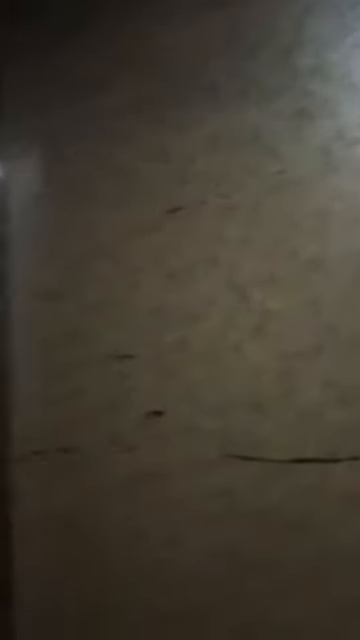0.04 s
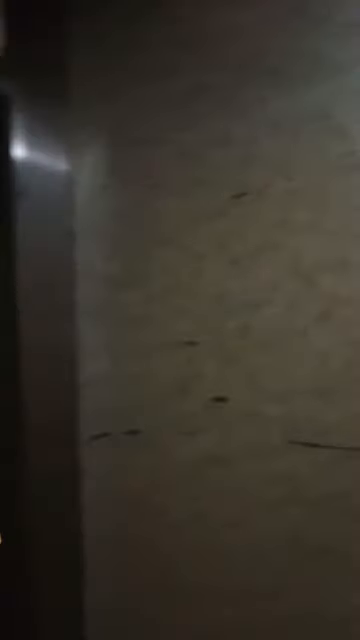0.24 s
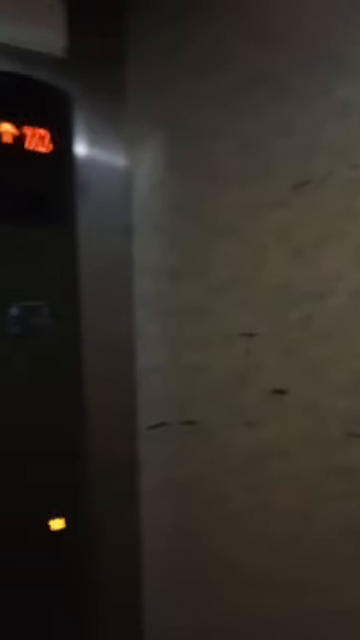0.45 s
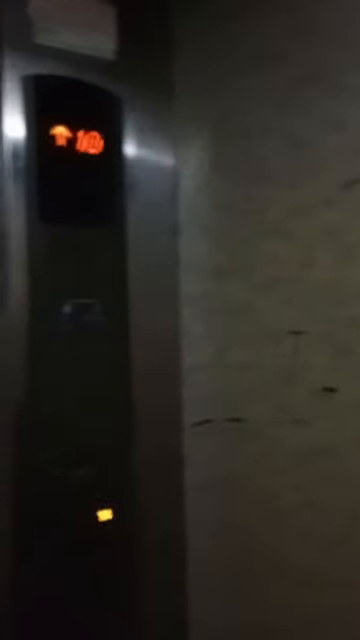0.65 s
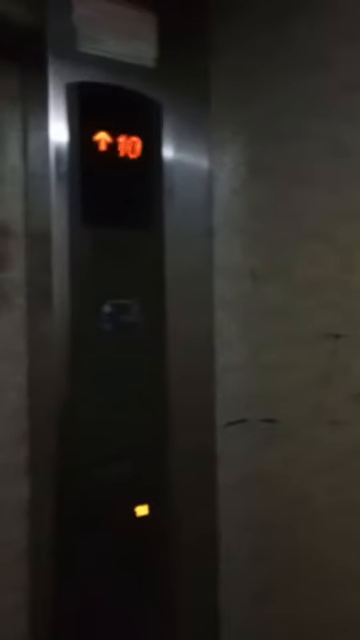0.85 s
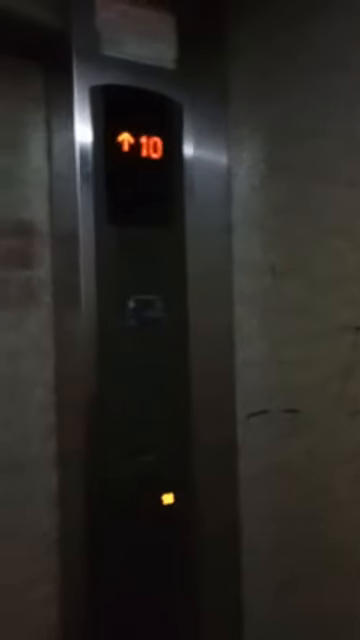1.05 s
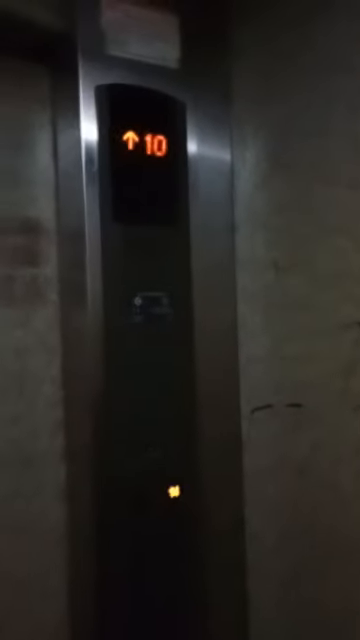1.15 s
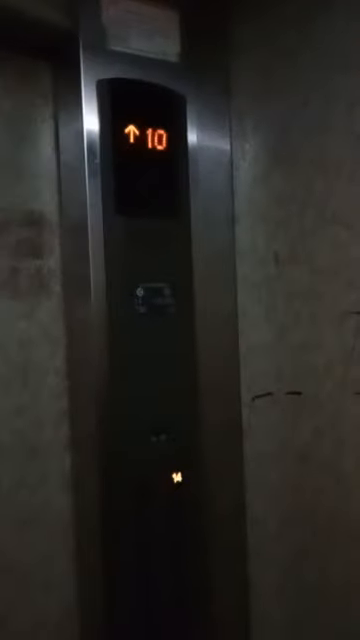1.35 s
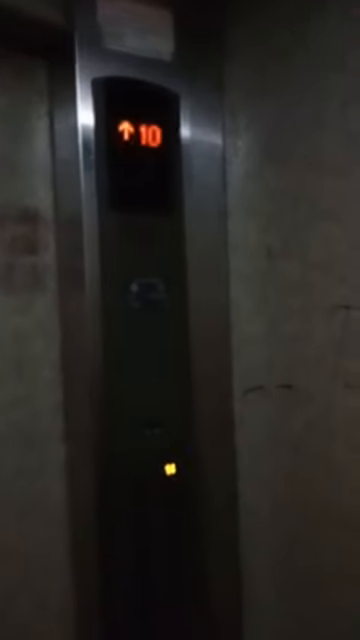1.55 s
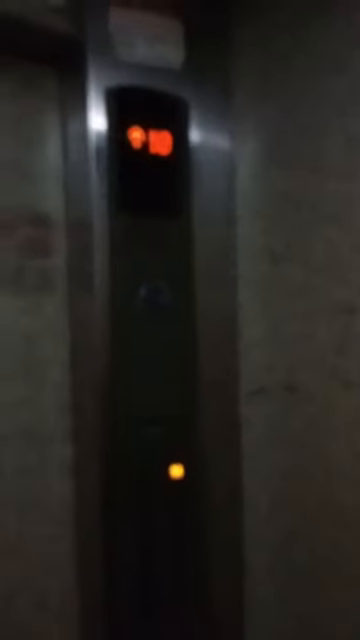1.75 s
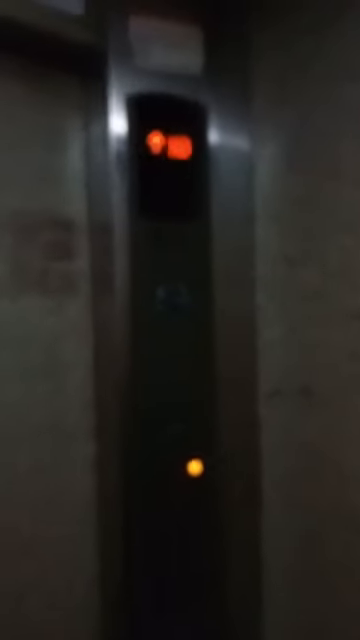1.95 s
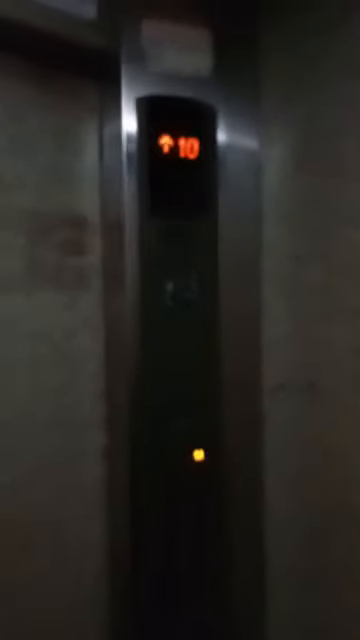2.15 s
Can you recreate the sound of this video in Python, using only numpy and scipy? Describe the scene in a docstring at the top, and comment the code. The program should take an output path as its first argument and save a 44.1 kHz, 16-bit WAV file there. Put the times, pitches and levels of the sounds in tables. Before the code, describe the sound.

Loose metal rattling and scraping in short dry bursts inside a small moving elevator cabin

```python
"""Inside a small old lift cabin on its way up, over the drone and rumble of the ride, something loose
rattles and scrapes in short dry bursts, some contacts knock with a hollow ring, and the floor thumps.
Scrapes and knocks are random slips filtered by resonances; squeaks and thumps are enveloped sines.
The ride is filtered noise with wavering sines; standing waves hum and boom in the air, and the hard
walls answer every scrape, knock and squeak with a dense decaying tail."""
import sys
import numpy as np
from scipy import signal
from scipy.fft import rfft, irfft, next_fast_len
from scipy.io import wavfile
from scipy.ndimage import map_coordinates

SR = 44100
rng = np.random.default_rng(int(sys.argv[2]) if len(sys.argv) > 2 else 0)


def pcm_store(signal):
    """Save signal as 16-bit PCM."""
    levels = np.round(np.clip(np.atleast_2d(signal), -1, 1) * 32767)
    wavfile.write(sys.argv[1], SR, levels.astype(np.int16).T)


N = 97020


def amp(db):
    """Level to amplitude: 20 dB is a factor of ten."""
    return 10 ** (np.asarray(db) / 20)


def unit(x):
    """Normalise the mean power: scale to rms 1."""
    return x / np.sqrt(np.mean(x ** 2) + 1e-20)


def along(points, hz):
    """Interpolate (frequency [Hz], value) points on a logarithmic frequency axis."""
    f, v = np.transpose(points)
    return np.interp(np.log(hz + 1), np.log(f + 1), v)


def wobble(rate):
    """Band-limited randomness: a smooth curve through random knots, rate of them per second."""
    knots = rng.standard_normal(int(N * rate / SR) + 4)
    return map_coordinates(knots, [np.arange(N) * rate / SR])


def coloured(x, gain):
    """Minimum-phase filtering: the folded cepstrum of gain(f) gives a causal response."""
    size = 2 * next_fast_len(len(x) // 2 + 2048)
    magnitude = np.maximum(gain(np.fft.rfftfreq(size, 1 / SR)), 1e-6)
    cepstrum = irfft(np.log(magnitude), size)
    cepstrum[1:size // 2] *= 2
    cepstrum[size // 2 + 1:] = 0
    response = np.exp(rfft(cepstrum))
    return irfft(rfft(x, size) * response, size)[:len(x)]


def resonances(modes, f, order=1):
    """Damped-oscillator gains of (Hz, width Hz, dB) modes, summed in power; order steepens the skirts."""
    power = 0
    for centre, width, db in modes:
        response = abs(f * width / (centre * centre - f * f + 1j * f * width))
        power = power + (amp(db) * response ** order) ** 2
    return np.sqrt(power)


def add(track, start, sound):
    """Superposition: mix a sound into the track at its start time in seconds."""
    part = track[max(0, round(start * SR)):][:len(sound)]
    part += sound[:len(part)]


def cabin():
    """Reverberation of close walls: dense noise decaying at a rate set by frequency."""
    # reverberation time: (frequency [Hz], time to fall 60 dB [s])
    decay_times = [(200, 0.68), (1000, 0.26), (3000, 0.27), (7000, 0.21), (11000, 0.24), (16000, 0.19)]
    build_s = 0.0018
    size = SR // 2
    hz, t, spectrum = signal.stft(rng.standard_normal(size), SR, nperseg=256)
    decay = amp(-60 * t / along(decay_times, hz)[:, None])
    tail = signal.istft(spectrum * decay, SR, nperseg=256)[1][:size]
    tail *= 1 - np.exp(-np.arange(size) / SR / build_s)
    return tail / np.linalg.norm(tail)


def contact(length, gain, room, count=4):
    """Stick-slip friction: tiny slips at a few places, filtered by gain(f); loudest part near rms 1."""
    slips_per_s, slip_spread_db, slip_rise_s = 900, 5, 0.00081  # slip rate over all places together
    rub_share = 0.46  # steady rubbing noise beside the slips
    direct = 0.33  # unreflected sound, against a wall tail of energy 1
    shared_tail = 0.44  # share of the wall answer's energy that all places have in common
    tail_s, stroke_share = 0.015, 0.33  # the energy spreads over the tail and this share of the length
    size = SR // 2
    u = np.clip(np.arange(size) / SR / length, 0, 1)
    stroke = (1 - np.exp(-u * length / slip_rise_s)) * np.sqrt(1 - u)
    sound = np.zeros(size)
    for place in range(count):
        moments = rng.random(size) < slips_per_s / count / SR
        slips = moments * amp(slip_spread_db * rng.standard_normal(size))
        signed_slips = unit(slips * rng.choice([-1, 1], size))
        force = (signed_slips + rub_share * rng.standard_normal(size)) * stroke
        walls = np.sqrt(shared_tail) * room + np.sqrt(1 - shared_tail) * cabin()
        walls[0] = direct
        sound += signal.fftconvolve(force, walls)[:size]
    return unit(coloured(sound, gain)) * np.sqrt((tail_s + length * stroke_share) * SR / size)


def ride():
    """Broadband and tonal noise: rumble of the moving cabin, rush of air and rails, wavering drone."""
    # rumble spectrum: (frequency [Hz], relative level [dB])
    rumble_colour = [(15, -45), (30, -15.5), (48, -6.5), (85, -1), (110, -7), (155, -3.5), (180, -19),
                     (300, -23.5), (1000, -73), (4000, -100)]
    # rumble over time: (time [s], rms level [dB])
    rumble_level = [(0, -64), (.27, -62), (.39, -68), (.53, -63.5), (.7, -58), (.84, -64.5), (.94, -60),
                    (1.15, -63.5), (1.35, -64), (1.7, -63), (2.2, -66.5)]
    # air and rail noise spectrum ahead of its bass cut: (frequency [Hz], relative level [dB])
    rush_colour = [(200, -10), (270, -6), (400, -8), (750, -7), (1100, -16), (2150, -15.5), (2500, -20.5),
                   (5000, -25.5), (7300, -21), (8000, -34.5), (9500, -37), (10500, -31), (13400, -45),
                   (15200, -27.5)]
    # air and rail noise over time: (time [s], rms level [dB])
    rush_level = [(0, -63.5), (.35, -69), (.7, -63.5), (1.05, -64.5), (1.4, -59.5), (1.7, -65),
                  (2.2, -63.5)]
    # drone partials: (frequency [Hz], rms level ahead of the waver [dB])
    drone_partials = [(86, -68), (226, -78), (269, -75.5), (2150, -84.5)]
    rush_low_hz, waver, drift_rad = 170, 0.26, 0.52
    t = np.arange(N) / SR

    def level(rows):
        """Linear interpolation of level over time, as amplitude."""
        return amp(np.interp(t, *np.transpose(rows)))

    def rush_gain(f):
        """High-pass filtering of the rush spectrum."""
        return amp(along(rush_colour, f)) * (1 - np.exp(-(f / rush_low_hz) ** 4))

    rumble = unit(coloured(rng.standard_normal(N), lambda f: amp(along(rumble_colour, f))))
    rush = unit(coloured(rng.standard_normal(N), rush_gain))
    drone = np.zeros(N)
    for hz, db in drone_partials:
        swell = 1 + waver * wobble(10.13)
        drone += amp(db) * np.sqrt(2) * swell * np.sin(2 * np.pi * hz * t + drift_rad * wobble(7.03))
    return rumble * level(rumble_level) + rush * level(rush_level) + drone


def standing_waves():
    """Room modes: the enclosed air hums at its own few pitches and booms whenever the cabin shakes."""
    # standing waves: (frequency [Hz], width of one resonance ahead of steepening [Hz], relative level [dB])
    air_modes = [(199.2, 7.3, 0), (225.8, 9.8, 0.5), (256.4, 11.8, -2.5), (270.3, 8.9, 1),
                 (288.6, 14, -4.5), (343.4, 10.3, -7.5), (397.6, 12, -10.5), (418.7, 13.5, -8.5)]
    # booms as the cabin shakes: (start [s], length [s], level added at the middle [dB])
    booms = [(0.156, 0.22, -60.5), (0.76, 0.092, -66.5), (1.148, 0.48, -66), (1.904, 0.15, -66)]
    steady_db = -68.5  # how much the steady ride keeps the modes sounding
    ring = unit(coloured(rng.standard_normal(N), lambda f: resonances(air_modes, f, order=2)))
    swell = np.full(N, amp(steady_db))
    for start, length, db in booms:
        u = np.clip((np.arange(N) / SR - start) / length, 0, 1)
        swell += amp(db) * 2 * np.sqrt(u * (1 - u))
    return swell * ring


def thumps():
    """Damped low-frequency vibration: the floor swells into a few slow cycles and settles."""
    # floor thumps: (time of the peak [s], envelope peak [dB], pitch [Hz], swell time constant [s])
    floor_thumps = [(0.28, -52.5, 205, 0.048), (0.788, -40, 71.5, 0.015), (1.289, -45, 70.4, 0.025),
                    (1.507, -40.5, 67, 0.027), (1.97, -45.5, 85, 0.031), (2.195, -42, 74, 0.015)]
    fall_s, waver_rad = 0.018, 0.92
    out = np.zeros(N)
    for peak, db, hz, swell_s in floor_thumps:
        t = np.arange(N) / SR - peak
        envelope = np.exp(np.minimum(t / swell_s, -t / fall_s))
        out += amp(db) * envelope * np.sin(2 * np.pi * hz * t + waver_rad * wobble(40.3))
    return out


def squeaks(room):
    """Friction-driven oscillation: a catching surface whistles briefly in a few unsteady tones."""
    # squeaks: (start [s], length [s], level on which the tones' own are added [dB])
    squeak_events = [(0.754, 0.026, -63), (1.893, 0.029, -47.5)]
    # whistling tones: (frequency [Hz], relative level [dB], phase jitter [rad])
    squeak_tones = [(4960, -6, 0.45), (7220, 2.5, 2.2), (10600, -8, 1.1)]
    jitter_per_s, wet = 590, 0.85  # knots of phase jitter per second; gain of the wall answer
    out, t = np.zeros(N), np.arange(N) / SR
    whistle = np.zeros(N)
    for hz, db, jitter in squeak_tones:
        whistle += amp(db) * np.sin(2 * np.pi * hz * t + jitter * wobble(jitter_per_s))
    for start, length, db in squeak_events:
        u = np.clip((t - start) / length, 0, 1)
        out += amp(db) * 4 * u * (1 - u) * whistle
    return out + wet * signal.fftconvolve(out, room)[:N]


def knocks(room):
    """Modal ringing: duller contacts excite a hollow part near 1 kHz and a ladder of modes above."""
    # hollow knocks: (start [s], length [s], contact level [dB], pitch [ratio], damping [ratio])
    knock_events = [(0.225, 0.026, -43, .85, 2), (0.319, 0.0096, -38.5, 1.154, 2.6),
                    (0.343, 0.0038, -46, 1.13, 1.5), (0.392, 0.0069, -36.5, 1.0, 1.26),
                    (0.418, 0.016, -42.5, 1.0, 1.1), (0.457, 0.0092, -46, 1.05, 1.1),
                    (0.482, 0.0048, -38.5, 0.98, 1.8), (0.502, 0.018, -44.5, 0.95, 2.2),
                    (0.535, 0.017, -58, 0.99, 1.3), (0.787, 0.028, -58, 0.593, 2.1),
                    (1.224, 0.082, -57, 0.88, 3), (1.373, 0.0047, -49, 0.85, 2.6),
                    (1.39, 0.0059, -49.5, 0.86, 3.8), (1.407, 0.012, -45.5, 0.86, 2.3),
                    (1.442, 0.068, -51.5, 0.92, 5.9)]
    # hollow part at pitch and damping ratio 1: (frequency [Hz], width ahead of steepening [Hz], level [dB])
    hollow_modes = [(941, 150, 1.5), (1100, 237, 2), (1440, 290, -12), (2470, 430, -3), (3560, 270, -7),
                    (4800, 480, -4), (5940, 760, -7), (7070, 490, -7)]
    low_hz, top_hz = 700, 8050  # band edges; the lower one moves with the pitch
    ring_db, ring_t60_s, ring_rise_s = -7, 0.054, 0.0042  # the two lowest modes ring on
    soft_contact_s = 0.06  # long contacts ring less
    soft_knock_db = 34  # treble lost per unit drop in pitch: low knocks are softer ones
    out, t = np.zeros(N), np.arange(SR // 2) / SR
    fade = (1 - np.exp(-(t / ring_rise_s) ** 2)) * amp(-60 * t / ring_t60_s)
    for start, length, db, pitch, damping in knock_events:
        modes = np.array(hollow_modes) * [pitch, pitch * damping, 1]
        modes[2:, 2] -= soft_knock_db * (1 - pitch)

        def gain(f):
            """Modal resonance within a limited band."""
            bass_cut = 1 - np.exp(-(f / pitch / low_hz) ** 4)
            return resonances(modes, f, order=2) * bass_cut / (1 + (f / top_hz) ** 20)

        ring = np.zeros(len(t))
        for hz, width, level in modes[:2]:
            ring += amp(level) * np.sin(2 * np.pi * (hz * t + rng.random()))
        ring *= fade * amp(ring_db) * np.exp(-length / soft_contact_s)
        add(out, start, amp(db) * (contact(length, gain, room) + ring))
    return out


def scrapes(room, count=9):
    """Friction exciting metal modes: bright dry contacts, each with its own body, sheen and clinks."""
    # dry scrapes and clicks: (start [s], length [s], level [dB],
    # body gain, full below 3.5 kHz [dB], sheen gain, full above 11 kHz [dB])
    scrape_events = [(0.008, 0.013, -54.5, 3.5, 8.5), (0.02, 0.025, -47.5, -3.5, 0.5),
                     (0.141, 0.042, -60.5, 14, 4), (.160, 0.018, -48, 2.5, -0.5), (0.183, 0.036, -54, 0, 0),
                     (0.2119, 0.0034, -30.5, 0.5, -2), (0.223, 0.014, -25.5, 0, 0),
                     (0.272, 0.014, -34.5, 2, -12), (0.316, 0.012, -31.5, 3, -1.5),
                     (0.354, 0.024, -36.5, 4, -3), (0.39, 0.0078, -43, 2, 2.5),
                     (0.481, 0.0028, -40.5, 6, -8), (0.76, 0.034, -56, -30, -4),
                     (0.801, 0.043, -61.5, 7, -5), (.843, 0.036, -57.5, 8.5, -2),
                     (0.884, 0.14, -64.5, 3.5, -0.5), (0.983, 0.05, -61.5, -0.5, 1),
                     (1.084, 0.018, -51.5, -2, 1), (1.158, 0.028, -59, 11.5, 3),
                     (1.222, 0.034, -58, -20, -7), (1.2745, 0.0039, -44, 2, 1),
                     (1.314, 0.005, -46, -2, -2.5), (1.352, 0.0031, -44, -1.5, -4.5),
                     (1.368, 0.0035, -48.5, -14, 7), (1.378, 0.072, -51, -46, 2),
                     (1.474, 0.0043, -42.5, -20, 8.5), (1.498, 0.061, -54.5, 0, -4),
                     (1.901, 0.013, -43.5, 3.5, 12), (1.916, 0.049, -44.5, 3.5, -5),
                     (1.975, 0.045, -52.5, 5.5, 5.5), (2.033, 0.082, -52.5, 3.5, 3.5),
                     (2.096, 0.005, -44, 1.5, 5), (2.117, 0.076, -51, -2, 3), (2.186, 0.026, -50.5, -8, 3)]
    # broad spectrum of the scraping: (frequency [Hz], relative level [dB])
    scrape_colour = [(200, -38), (450, -43), (660, -23.5), (1500, -15), (2600, -12.5), (4200, -7.5),
                     (5800, -7), (7400, 0.5), (8200, -13.5), (9300, -17), (10600, -8.5), (12000, -24.5),
                     (13500, -27), (15200, -16)]
    # metal resonances ahead of their tilt: (frequency [Hz], width [Hz], relative level [dB])
    metal_modes = [(5950, 260, 0.5), (6450, 190, -11), (6700, 40, -6)]
    clink_low_hz, clink_top_hz = 1394, 6987  # each contact picks out its own few metal modes
    clink_width_hz, clink_db = 54, 5  # width ahead of steepening
    out = np.zeros(N)
    for start, length, db, body_db, sheen_db in scrape_events:
        tone = [(3500, body_db), (6500, 0.012), (7500, 0.043), (11000, sheen_db)]  # (Hz, dB)
        clink_hz = rng.uniform(clink_low_hz, clink_top_hz, count)
        clinks = [(hz, clink_width_hz, clink_db) for hz in clink_hz]

        def gain(f):
            """Power sum of broad colour and metal modes, shaped by tone and clinks."""
            tilt = (f / 7000) ** 2 / (1 + (f / 7500) ** 12)
            colour = np.hypot(amp(along(scrape_colour, f)), resonances(metal_modes, f) * tilt)
            return colour * amp(along(tone, f)) * np.hypot(1, resonances(clinks, f, order=2))

        add(out, start, amp(db) * contact(length, gain, room))
    return out


def scene():
    """Superposition of every source in the cabin, on one channel."""
    room = cabin()
    background = ride() + standing_waves()
    events = thumps() + squeaks(room) + knocks(room) + scrapes(room)
    return (background + events)[None]


def record(dry):
    """Band limiting: nothing at or above the top frequency is kept."""
    top_hz = 15900
    size = next_fast_len(N + SR // 2)
    passband = np.fft.rfftfreq(size, 1 / SR) < top_hz
    return irfft(rfft(dry, size) * passband, size)[..., :N]


dry = scene()
out = record(dry)
pcm_store(out)
```